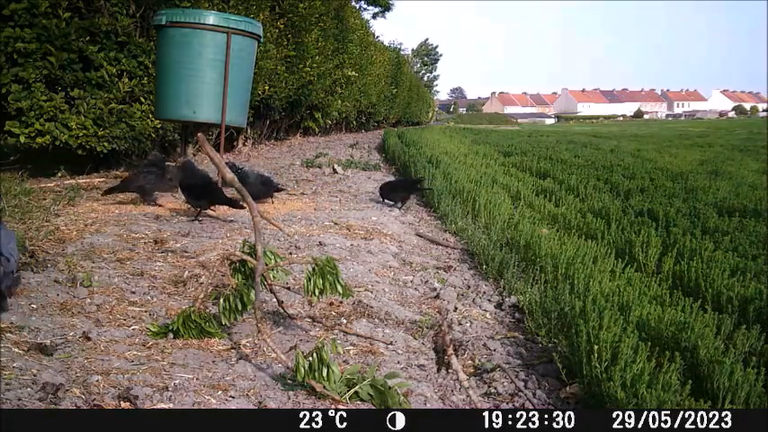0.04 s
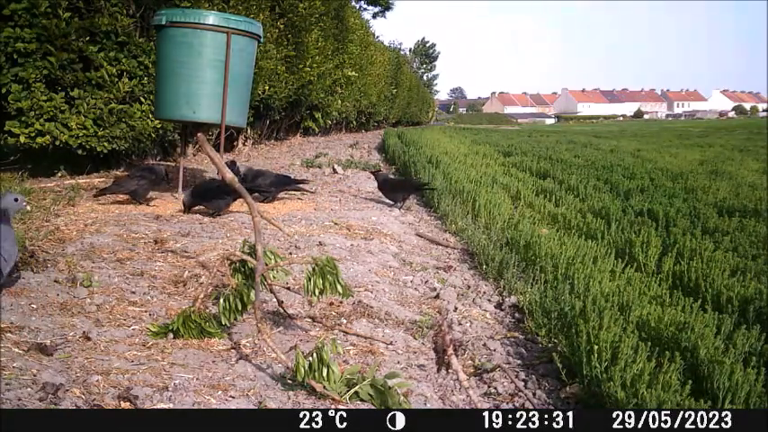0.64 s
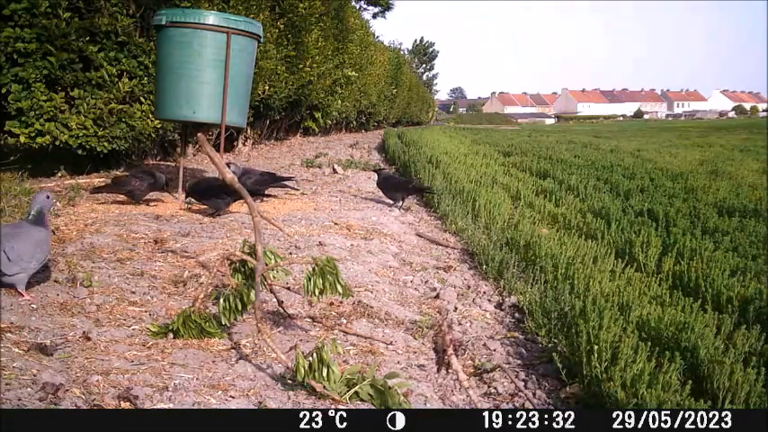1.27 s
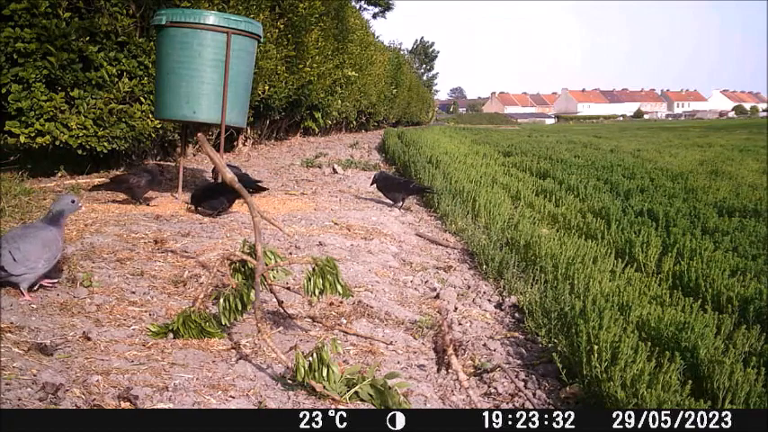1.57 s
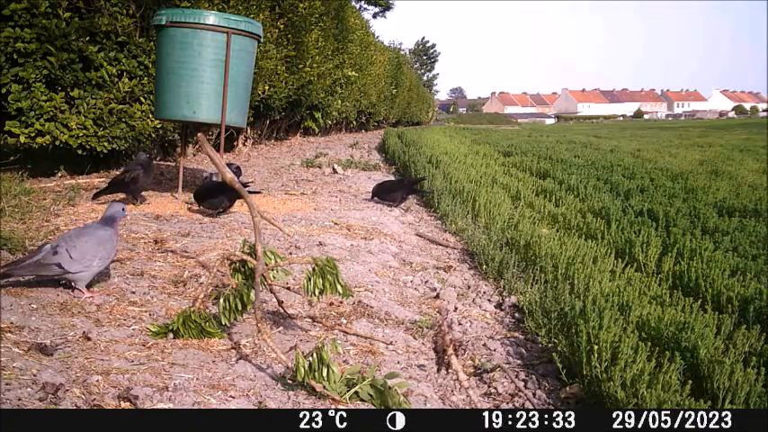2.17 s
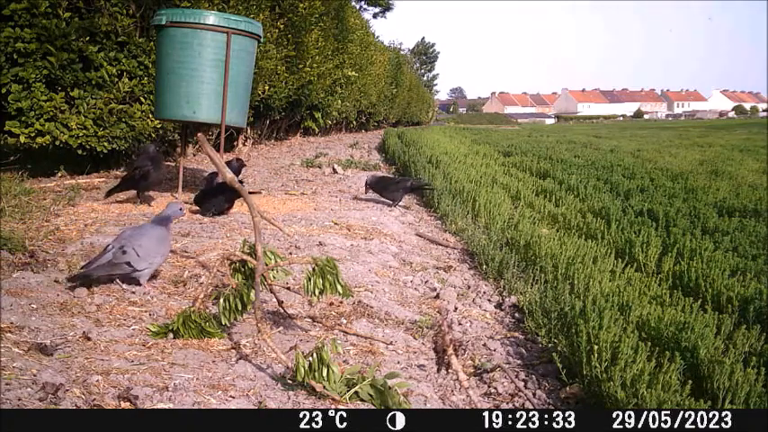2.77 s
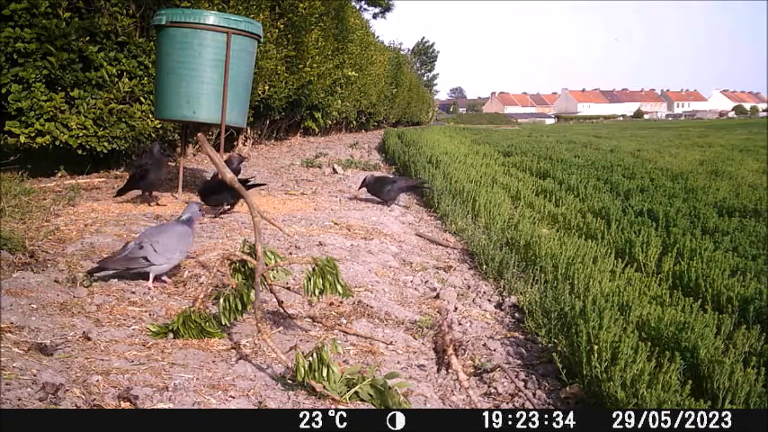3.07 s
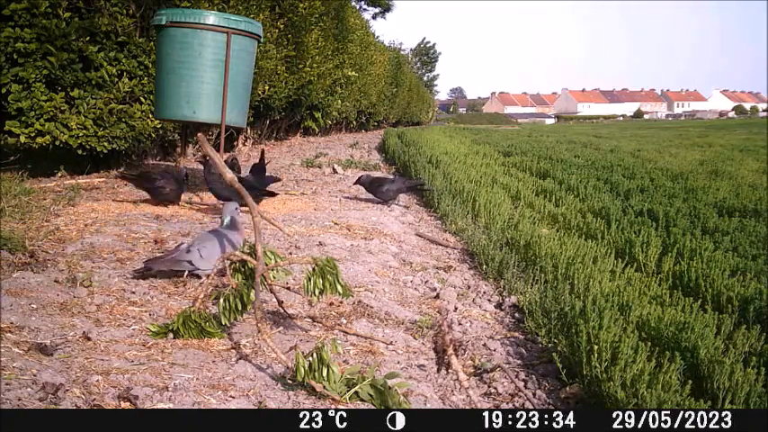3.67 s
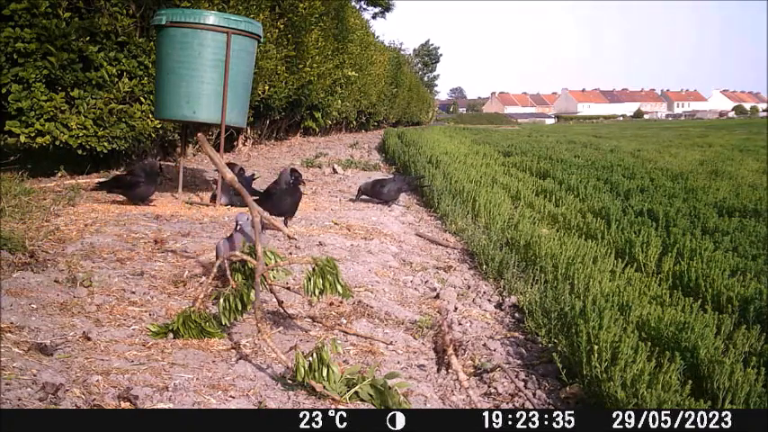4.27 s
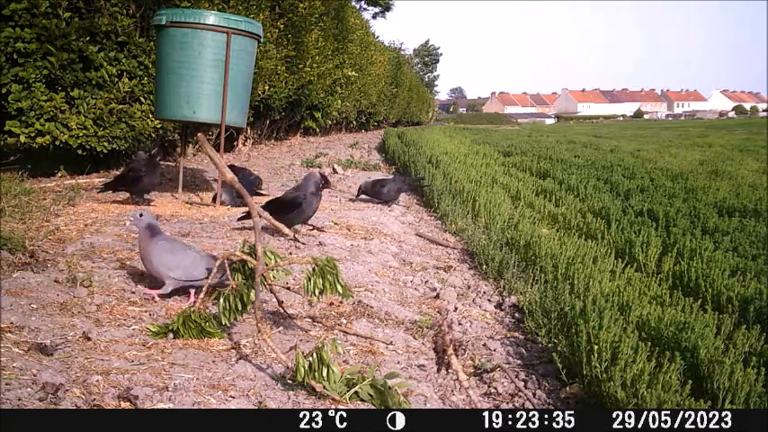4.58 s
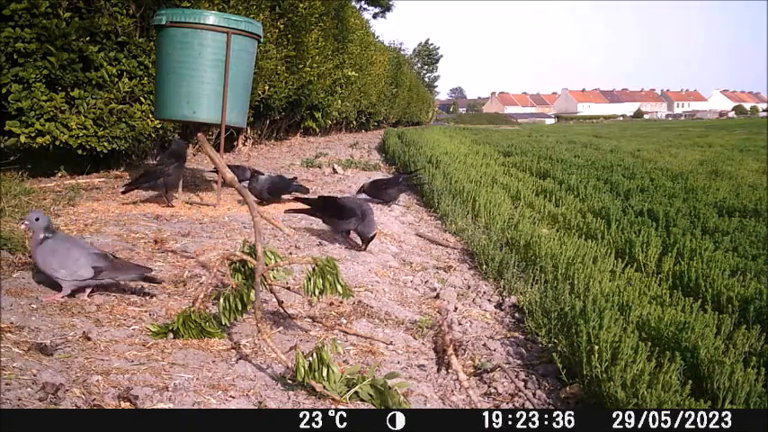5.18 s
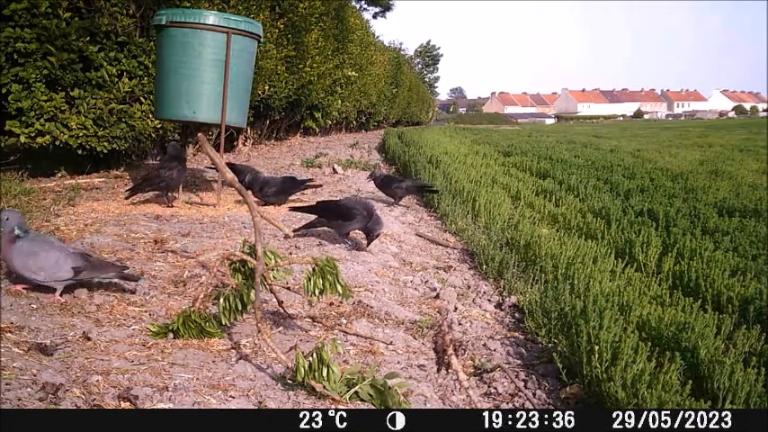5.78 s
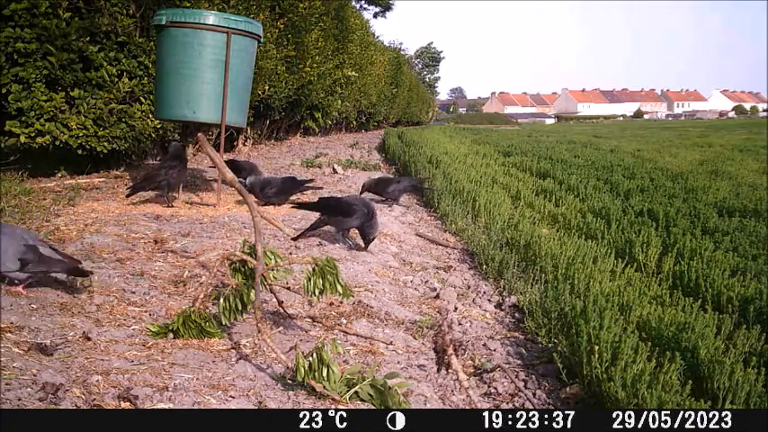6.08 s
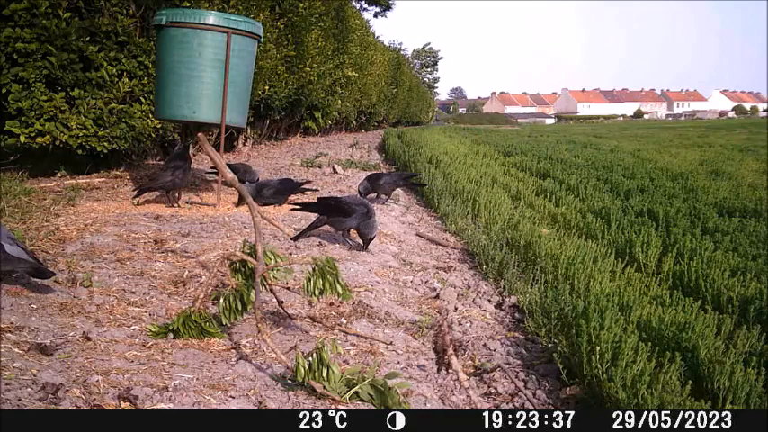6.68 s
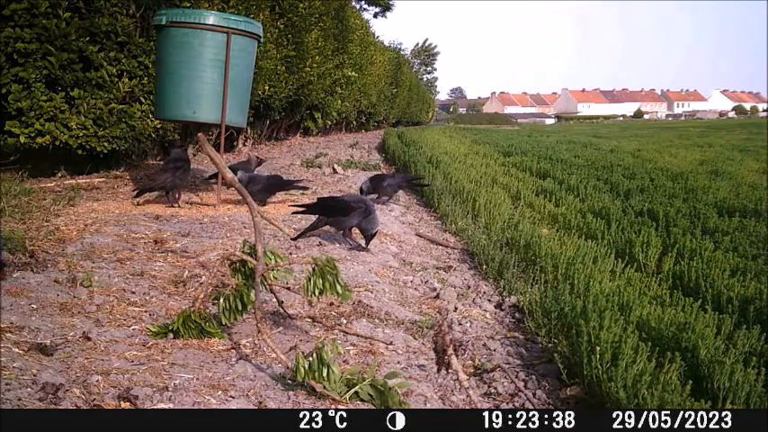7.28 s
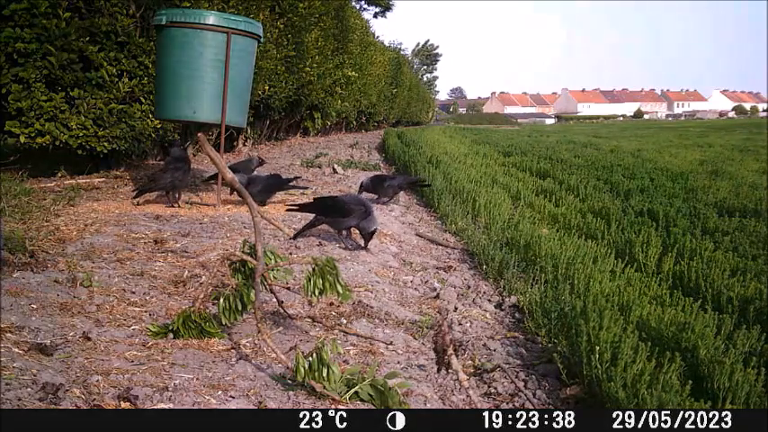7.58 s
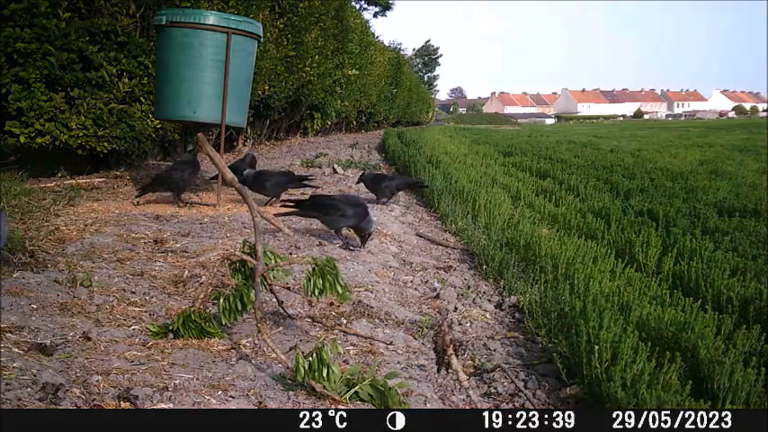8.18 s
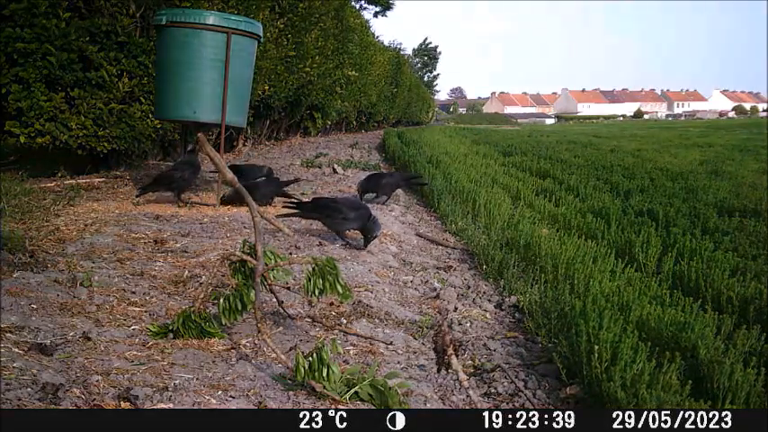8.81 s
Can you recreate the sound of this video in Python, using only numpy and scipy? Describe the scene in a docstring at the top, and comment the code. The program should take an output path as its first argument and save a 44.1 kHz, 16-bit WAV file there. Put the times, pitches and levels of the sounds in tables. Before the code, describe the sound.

From the start, a soft, steady rumble of outdoor air sits under a faint hiss. The camera's electronics add a very faint high whine, pulsing about five times a second. A small puff of wind bumps the microphone at about 0.4 seconds. At about 3.7 and 3.9 seconds a jackdaw gives two short, fairly quiet nasal calls, each falling in pitch and ending roughly, with a weak echo from a hedge. The wind begins to swell near 5 seconds. From about 6.3 seconds, stronger gusts buffet the microphone, with dull thumps against the housing and brief low hums around 6.8 and 7.1 seconds. The faint whine turns into a more continuous sputtering buzz between roughly 6.4 and 8.2 seconds. The gusts are loudest just after 7 seconds and again from 8 seconds to the end at about 9 seconds.

```python
"""A trail camera stands by a bird feeder at the edge of a field. From the start, moving air rumbles
under faint hiss, and the camera's electronics whine faintly in bursts five times a second.
Near 3.7 s a jackdaw gives two short falling calls, with a weak echo from the hedge.
In the second half gusts buffet the microphone, with brief low hums and eddies slapping the housing."""
import sys
import numpy as np
from scipy import signal
from scipy.fft import rfft, irfft, next_fast_len
from scipy.io import wavfile
from scipy.ndimage import uniform_filter1d, map_coordinates

SR = 44100
rng = np.random.default_rng(int(sys.argv[2]) if len(sys.argv) > 2 else 0)


def file_out(sig):
    """Save sig as 16-bit WAV at sys.argv[1]."""
    # one column per channel
    cols = np.atleast_2d(sig).T
    # limit, then scale
    lim = np.clip(cols, -1, 1)
    pcm = np.round(lim * 32767).astype(np.int16)
    wavfile.write(sys.argv[1], SR, pcm)


N = 399105
TIME_S = np.arange(N) / SR


def amp(db):
    """Decibels to gain."""
    return 10 ** (np.asarray(db) / 20)


def unit(x):
    """Scale to rms 1."""
    return x / np.sqrt(np.mean(x ** 2) + 1e-20)


def gain_at(spectrum, hz):
    """Gain from (frequency [Hz], level [dB]) points on a log axis."""
    points_hz, points_db = np.transpose(spectrum)
    return amp(np.interp(np.log(hz + 1), np.log(points_hz), points_db))


def wobble(rate_hz):
    """Smooth random curve, rate_hz knots a second."""
    return map_coordinates(rng.standard_normal(size=4000), [TIME_S * rate_hz], mode="mirror")


def gate(t, start_s, end_s, edge_s):
    """Soft-edged window from start_s to end_s."""
    return (1 + np.tanh((t - start_s) / edge_s)) * (1 - np.tanh((t - end_s) / edge_s)) / 4


def filtered(x, response):
    """Apply a frequency response; mirrored margins keep the ends smooth."""
    size = next_fast_len(N + SR // 2)
    margin = (size - N) // 2
    padded = np.pad(x, (margin, size - N - margin), mode="reflect")
    return irfft(rfft(padded) * response(np.fft.rfftfreq(size, 1 / SR)), size)[margin:][:N]


def noise(spectrum):
    """Coloured noise, rms 1."""
    return unit(filtered(rng.standard_normal(N), lambda hz: gain_at(spectrum, hz)))


def even_noise(spectrum, window_s=0.12):
    """Coloured noise with its slow chance swells levelled."""
    x = noise(spectrum)
    power = np.abs(uniform_filter1d(x ** 2, int(window_s * SR)))
    return x / np.sqrt(power + 1e-6)


def ringing(modes):
    """Noise in narrow resonances, rms 1."""
    def response(hz):
        return sum(amp(db) / (1 + 2 * ((hz - centre) / width) ** 2) for centre, width, db in modes)
    return unit(filtered(rng.standard_normal(N), response))


def phase_rad(hz):
    """Running phase of a pitch curve."""
    return 2 * np.pi * np.cumsum(hz) / SR


def wavering(modes, width_share, rate_hz):
    """Tones trembling in pitch by a share of their width, total rms 1."""
    return unit(sum(amp(db) * np.sin(phase_rad(hz + width_share * width * wobble(rate_hz)))
                    for hz, width, db in modes))


# hiss spectrum: (frequency [Hz], relative density [dB])
HISS_SPECTRUM = [(100, -4.5), (700, -3), (950, 2), (1150, 1), (1350, 2.5), (2200, -0.5), (3000, -3.5),
                 (4000, -9.5), (4700, -14), (5700, -13.5), (6300, -7.5), (6600, -9), (7200, -5.5),
                 (7800, -16)]
# microphone cavity resonances: (frequency [Hz], width [Hz], relative level [dB])
CAVITY_MODES = [(1140, 81, 2), (1065, 240, -3.5)]


def hiss(hiss_db=-69, cavity_db=-72, windy_boost_db=3.0, windy_from_s=6.3, waver_db=1.4):
    """Even hiss; the microphone cavity rings a little more once the wind is up."""
    windy = (1 + np.tanh((TIME_S - windy_from_s) * 2)) / 2
    cavity = ringing(CAVITY_MODES) * amp(cavity_db + windy_boost_db * windy + waver_db * wobble(16))
    return amp(hiss_db) * noise(HISS_SPECTRUM) + cavity


# whine, and buzz under load: (frequency [Hz], width [Hz], relative level [dB])
WHINE_MODES = [(2360, 190, 1.5), (3550, 400, -6), (5016, 250, -0.5), (6180, 210, -1), (7190, 490, -2)]
BUZZ_MODES = [(2380, 350, -1), (7000, 150, -2.5)]
# spans of unbroken whine: (start [s], end [s], load [0-1], buzz level [dB])
BUSY_SPANS = [(0, 0.082, 0.8, -94), (0.1, 0.387, 0.85, -87), (6.35, 7.03, 0.63, -78),
              (7.077, 7.534, 0.38, -80), (7.548, 8.196, 0.8, -84)]
# moments when the whine settles into a clean tone: (time [s], relative level [dB])
CLEAN_TONES = [(2.094, 0.5), (2.295, 4.5), (5.901, 6), (6.094, 3), (6.283, 4)]
# overtones of that tone: (multiple of coil_hz, relative level [dB])
COIL_OVERTONES = [(2, -1), (3, -10), (4, -4.5), (5, -5), (6, -18)]


def electronics(rasp_db=-76, pitched_db=-79, tick_db=-67, coil_db=-73, coil_hz=1235, sputter_db=2.5,
                period_s=0.1997, first_s=0.094, burst_s=0.047, edge_s=0.0031,
                blip_delay_s=0.087, blip_scatter_s=0.0041, blip_s=0.014):
    """Each work cycle opens with a dull tick, whines, and adds a short blip as a second beat."""
    cycle, cycle_s = np.divmod(TIME_S - first_s + period_s / 4, period_s)
    cycle_s -= period_s / 4
    from_blip_s = cycle_s - blip_delay_s - blip_scatter_s * rng.standard_normal(64)[cycle.astype(int)]
    load = gate(cycle_s, 0, burst_s, edge_s) + 0.4 * gate(cycle_s, burst_s, blip_delay_s, edge_s)
    load += 0.8 * gate(from_blip_s, -blip_s / 2, blip_s / 2, edge_s)
    buzz_gain = np.zeros(N)
    for start_s, end_s, busy_load, buzz_db in BUSY_SPANS:
        busy = gate(TIME_S, start_s, end_s, edge_s=0.0082)
        load = load * (1 - busy) + busy_load * busy * amp(sputter_db * wobble(38))
        buzz_gain += amp(buzz_db) * busy
    tick = amp(tick_db) * gate(cycle_s, -0.0052, 0, edge_s=0.0045) * ringing(CAVITY_MODES)
    settled = sum(amp(db) * gate(TIME_S, at_s, at_s + 0.025, edge_s=0.0024) for at_s, db in CLEAN_TONES)
    coil_rad = phase_rad(coil_hz * (1 + 0.002 * wobble(60)))
    tone = sum(amp(db) * np.sin(round(k) * coil_rad) for k, db in COIL_OVERTONES)
    rasp = amp(rasp_db) * ringing(WHINE_MODES)
    pitched = amp(pitched_db) * wavering(WHINE_MODES, width_share=0.45, rate_hz=400)
    whine = load * (rasp + pitched) * np.clip(1 - 0.5 * settled, 0, 1)
    return whine + buzz_gain * ringing(BUZZ_MODES) + amp(coil_db) * settled * tone + tick


# steady air, large slow eddies, small fast eddies: (frequency [Hz], relative density [dB])
BREEZE_SPECTRUM = [(8, 2.5), (25, -3), (42, -6.5), (70, -4), (112, -10.5), (135, -17), (190, -29),
                   (300, -35), (450, -41), (700, -50), (1500, -66)]
LARGE_EDDY_SPECTRUM = [(8, 0), (25, 0.5), (40, -0.5), (62, -10), (85, -15), (130, -28), (300, -69.5),
                       (1000, -110)]
SMALL_EDDY_SPECTRUM = [(20, -18), (60, -1), (80, 8), (112, 1), (128, -4), (145, -17), (200, -26.5),
                       (240, -38.5), (300, -48.5), (600, -61.5), (1500, -93.5)]
# steady air, and the flow building at the microphone: (time [s], level [dB])
BREEZE_LEVELS = [(0, -41), (0.8, -39.5), (1.3, -41.5), (2, -40), (5, -39)]
FLOW_LEVELS = [(3.9, -50), (4.7, -44), (5.2, -47.5), (5.55, -47.5), (5.8, -34.5), (6.02, -38),
               (6.28, -37.5), (6.47, -40), (6.72, -35), (6.97, -35), (7.299, -35), (7.6, -37),
               (7.92, -35.5), (8.15, -35), (8.33, -37), (8.55, -32.5), (8.799, -38.5), (9.05, -36.5)]
# single gusts: (peak time [s], length [s], large eddy level [dB], small eddy level [dB])
GUST_PEAKS = [(4.849, 0.036, -28.5, -48), (5.026, .06, -25.5, -53), (5.365, 0.11, -32.5, -43.5),
              (5.637, 0.075, -28.5, -52.5), (5.91, 0.032, -29, -48), (6.386, 0.032, -30, -38.5),
              (6.584, 0.039, -29, -29), (6.703, 0.047, -22.5, -37.5), (6.794, 0.07, -25, -31),
              (7.065, 0.063, -19, -23.5), (7.145, 0.076, -28, -26.5), (7.255, 0.049, -26, -31),
              (7.459, .06, -26, -38), (8.08, 0.13, -23.5, -31.5), (8.17, 0.073, -25.5, -28.5),
              (8.313, 0.068, -36, -29.5), (8.455, 0.068, -23.5, -27), (8.557, 0.12, -22.5, -27.5),
              (8.718, 0.049, -29, -28), (8.884, 0.068, -29, -26), (8.997, 0.044, -22, -30)]


def wind(swirl_db=1.26, swell_db=0.84, large_gain_db=6, small_gain_db=-3,
         small_slope=1.8, pivot_db=-30, smoothing_s=0.13):
    """Steady rumble plus gusts. Large eddies track the flow; small ones swell smoothly, more steeply."""
    flow_db = np.interp(TIME_S, *np.transpose(FLOW_LEVELS)) + swirl_db * wobble(12)
    smooth_flow_db = uniform_filter1d(flow_db, int(smoothing_s * SR))
    stirred_db = pivot_db + small_slope * (smooth_flow_db - pivot_db)
    large_power = amp(large_gain_db + flow_db) ** 2
    small_power = amp(small_gain_db + stirred_db) ** 2
    for peak_s, length_s, large_db, small_db in GUST_PEAKS:
        swell = np.exp(-(2 * (TIME_S - peak_s) / length_s) ** 2)
        large_power += amp(large_db) ** 2 * swell
        small_power += amp(small_db) ** 2 * swell
    breeze = even_noise(BREEZE_SPECTRUM)
    large = np.sqrt(large_power) * even_noise(LARGE_EDDY_SPECTRUM)
    small = np.sqrt(small_power) * even_noise(SMALL_EDDY_SPECTRUM)
    breeze_db = np.interp(TIME_S, *np.transpose(BREEZE_LEVELS)) + swell_db * wobble(4.4)
    return amp(breeze_db) * breeze + large + small


# slaps: (time [s], thump level [dB], frequency [Hz], half-length [s], puff level [dB])
SLAPS = [(0.395, -27.5, 78, .008, -59), (6.296, -26.5, 49.5, 0.0089, -60), (6.64, -15, 22.2, 0.028, -73),
         (6.777, -22, 48.6, 0.017, -72), (6.905, -17, 28, 0.019, -65), (7.181, -16, 25, 0.032, -62),
         (7.26, -15.5, 40.7, .014, -68), (7.302, -16.5, 25.2, 0.021, -72), (7.676, -16.5, 44.6, 0.016, -72),
         (8.094, -16.5, 55.8, 0.018, -58.5), (8.213, -12, 22.5, 0.019, -64), (8.421, -15, 33, 0.022, -61),
         (8.599, -19, 24.6, 0.022, -69), (8.7, -15.5, 37.2, 0.019, -71), (8.736, -11, 55, 0.008, -66),
         (8.985, -15, 61.5, 0.011, -67.5)]
# puff of a slap: (frequency [Hz], relative density [dB])
PUFF_SPECTRUM = [(100, 3.5), (300, -13), (680, -1.5), (900, -25), (2000, -46.5)]


def eddy_slaps(puff_half_s=0.012):
    """Single eddies hit the housing: a brief, low shudder of air with a dull puff."""
    out, puff = np.zeros(N), noise(PUFF_SPECTRUM)
    for at_s, thump_db, hz, half_s, puff_db in SLAPS:
        t = TIME_S - at_s
        thump = np.sin(2 * np.pi * hz * t) * np.exp(-(t / half_s) ** 2)
        out += amp(thump_db) * thump + amp(puff_db) * puff * np.exp(-(t / puff_half_s) ** 2)
    return out


# hums in the wind, and the short ring after the first slap:
# (time [s], level [dB], frequency [Hz], glide [octaves/s], half-length [s])
LOW_HUMS = [(0.408, -51, 200, 4.3, 0.013), (6.804, -28.5, 104, 0, 0.026), (7.094, -40.5, 195.6, 13, 0.021),
            (7.102, -24, 123.1, 1.5, 0.028), (7.17, -27, 121.2, 1, 0.026), (7.247, -61.5, 265, 3.5, 0.024),
            (7.306, -57, 317, -4, 0.0064), (8.098, -53.5, 215.4, 2, .014), (8.737, -48, 205, 6.5, 0.013)]


def low_hums():
    """Brief low hums, each with its own pitch glide, mostly upward."""
    out = np.zeros(N)
    for at_s, db, hz, octaves_per_s, half_s in LOW_HUMS:
        t = np.clip(TIME_S - at_s, -0.1, 0.1)
        pitch_hz = hz * 2 ** (octaves_per_s * t)
        out += amp(db) * np.exp(-(t / half_s) ** 2) * np.sin(phase_rad(pitch_hz))
    return out


# throat and beak response: (frequency [Hz], gain [dB])
THROAT_RESPONSE = [(700, -4.5), (900, -2.5), (1030, -0.5), (1400, -5), (1780, -13), (1980, -3),
                   (2120, -9.5), (2400, 1.5), (2750, -24), (3100, -21), (3600, -42), (4000, -42),
                   (4200, -29), (4700, -36), (5250, -30), (5800, -45)]
# calls: (time [s], length [s], top pitch [Hz], time to top [s], fall 40 ms later [octaves],
#         level [dB], overtone gain [dB], overtone rise [s])
JACKDAW_CALLS = [(3.67, 0.045, 1049, .014, 0.46, -46.5, -1, 0.0061),
                 (3.856, 0.041, 1020, 0.0041, 0.3, -47.5, 1, 0.0027)]


def jackdaw(attack_s=0.0042, release_s=0.0053, tail_share=0.15, tail_s=0.028,
            jitter_share=0.007, rasp_share=0.064, flutter_db=0.93, shimmer_db=3):
    """A clear nasal note that arches, then drops in pitch and turns rough as it dies."""
    out, t = np.zeros(N), np.arange(SR // 10) / SR
    for start_s, length_s, top_hz, top_s, fall_octaves, db, overtone_db, rise_s in JACKDAW_CALLS:
        drop_octaves = np.minimum(fall_octaves * ((t - top_s) / 0.04) ** 2, 1)
        closing = (1 + np.tanh((t - length_s + release_s) / release_s)) / 2
        jitter, shimmer = unit(uniform_filter1d(rng.standard_normal((2, len(t))), size=60))
        pitch_hz = top_hz * 2 ** -drop_octaves * (1 + (jitter_share + rasp_share * closing) * jitter)
        voice_rad = phase_rad(pitch_hz)
        tail = tail_share * np.exp(-(np.maximum(t - length_s, 0) / tail_s) ** 2)
        envelope = (1 - np.exp(-(t / attack_s) ** 2)) * (1 - closing + closing * tail)
        brightness = 1 - np.exp(-t / rise_s)  # higher overtones build up later
        note = np.zeros(len(t))
        for k in range(1, 6):
            gain = gain_at(THROAT_RESPONSE, k * pitch_hz) * amp(overtone_db * (k > 1))
            note += gain * brightness ** (k - 1) * np.sin(k * voice_rad)
        level_db = db + (flutter_db + shimmer_db * closing) * shimmer
        out[round(start_s * SR):][:len(t)] += amp(level_db) * envelope * note
    return out


def hedge_echo(x, echo_db=-24, t60_s=0.13, build_s=0.0148):
    """The hedge scatters back a weak, short echo."""
    t = np.arange(SR // 2) / SR
    tail = rng.standard_normal(len(t)) * amp(-60 * t / t60_s) * (1 - np.exp(-t / build_s))
    return amp(echo_db) * signal.fftconvolve(x, tail / np.linalg.norm(tail))[:N]


def scene():
    """Wind, the camera's own noises and the bird, in mono."""
    bird = jackdaw()
    air = wind() + eddy_slaps() + low_hums()
    return (air + hiss() + electronics() + bird + hedge_echo(bird))[None]


# dips in the camera's response: (frequency [Hz], width [Hz], depth [0-1])
CAMERA_NOTCHES = [(158.3, 50, 0.9), (627, 193, 0.69)]


def record(dry, cutoff_hz=7850, fade_s=0.0031):
    """Camera response: two notches and a steep low-pass, with click-free ends."""
    def response(hz):
        gain = 1 / np.sqrt(1 + (hz / cutoff_hz) ** 120)
        for centre_hz, width_hz, depth in CAMERA_NOTCHES:
            band = 1j * hz * width_hz / (centre_hz ** 2 - hz ** 2 + 1j * hz * width_hz)
            gain = gain * (1 - depth * band)
        return gain
    from_ends_s = np.minimum(TIME_S, N / SR - TIME_S)
    return filtered(dry[0], response)[None] * np.minimum(from_ends_s / fade_s, 1)


dry = scene()
out = record(dry)
file_out(out)
```